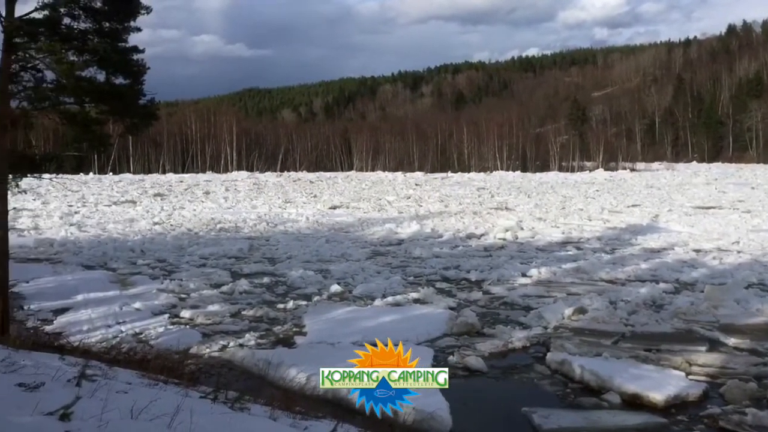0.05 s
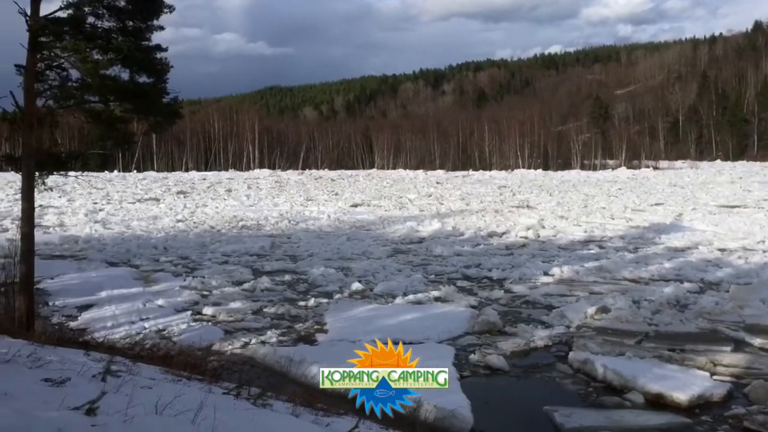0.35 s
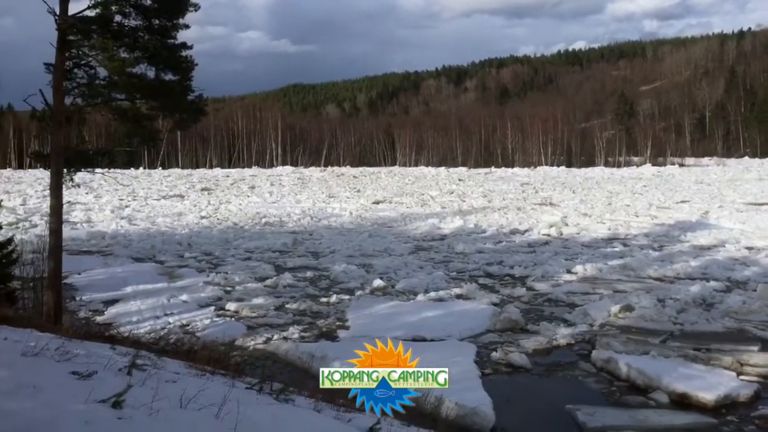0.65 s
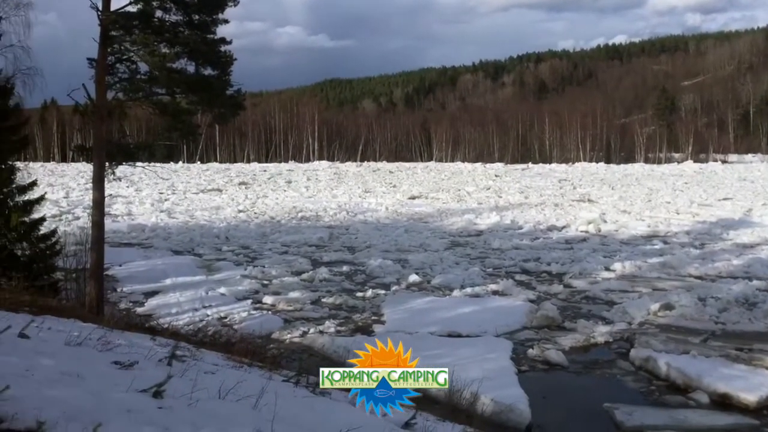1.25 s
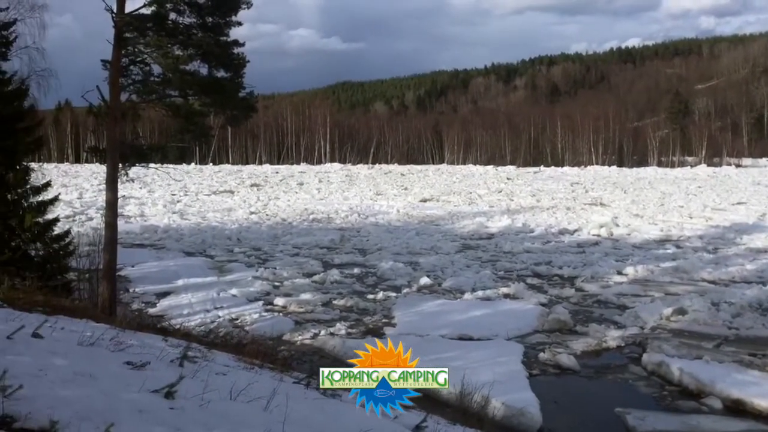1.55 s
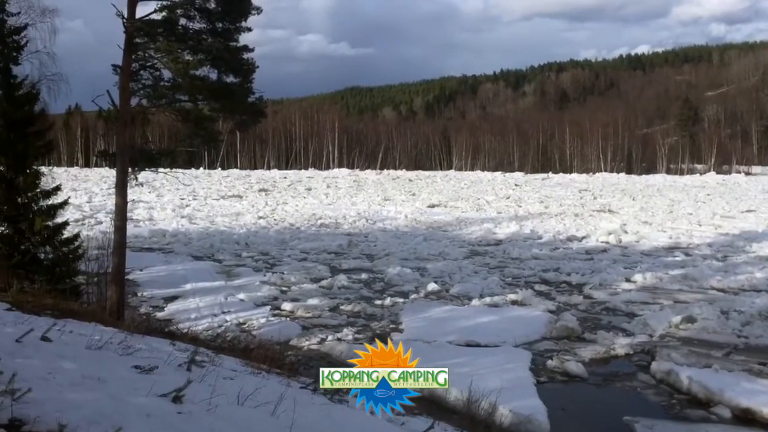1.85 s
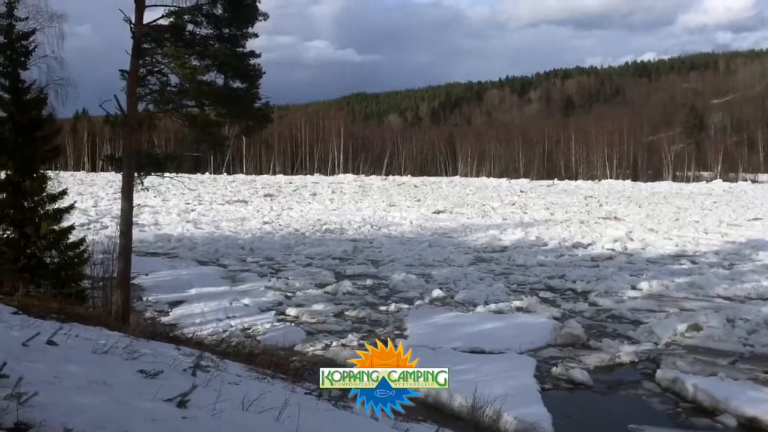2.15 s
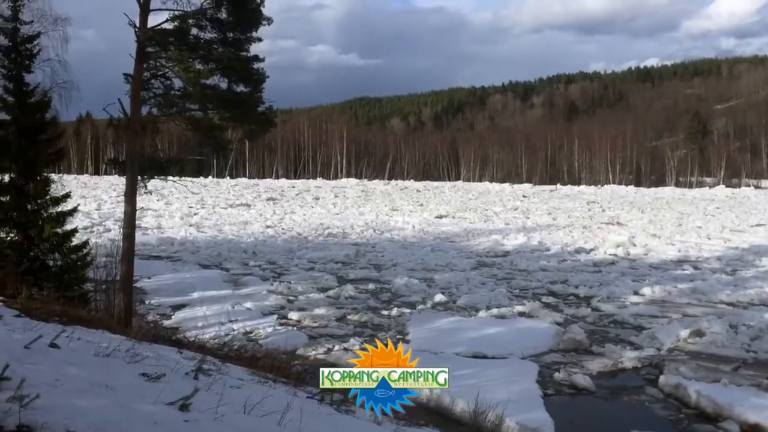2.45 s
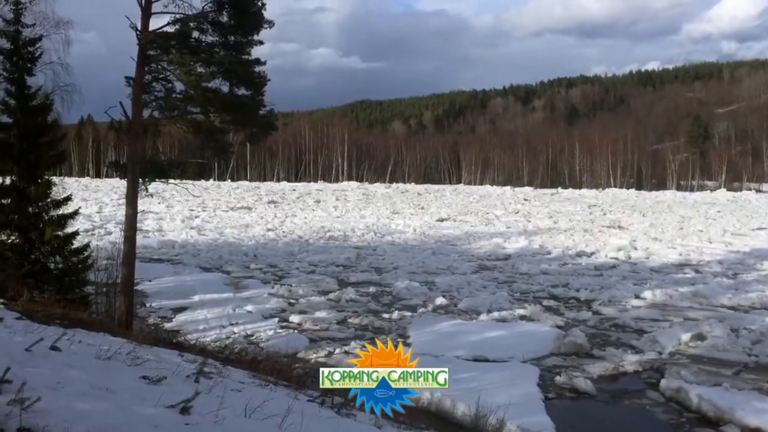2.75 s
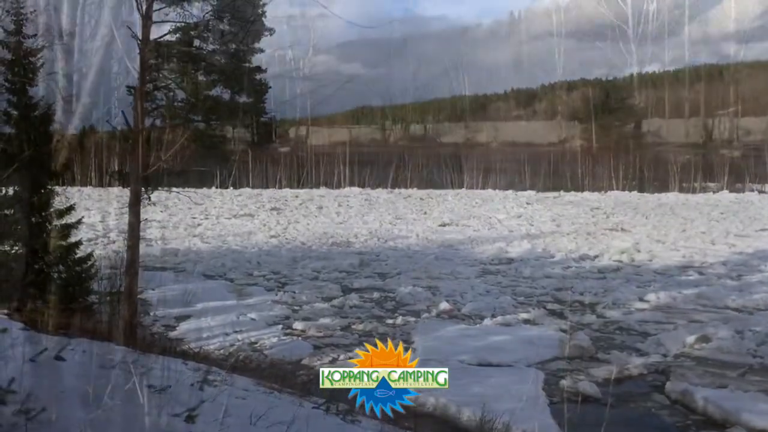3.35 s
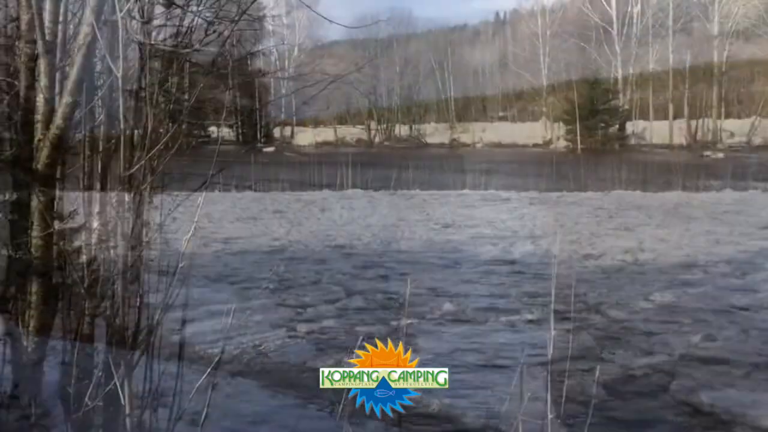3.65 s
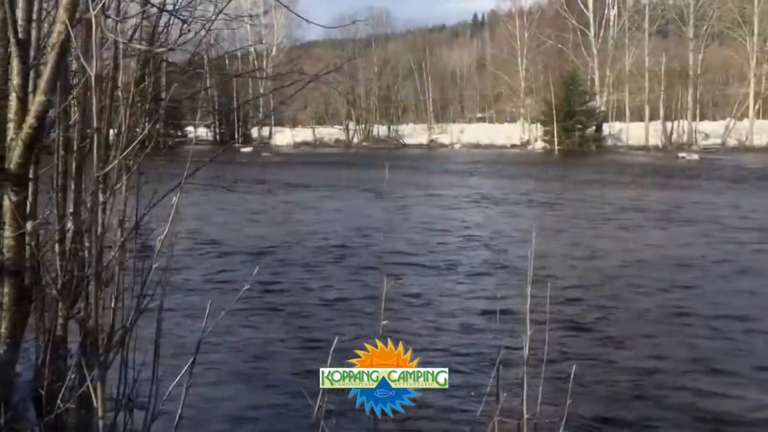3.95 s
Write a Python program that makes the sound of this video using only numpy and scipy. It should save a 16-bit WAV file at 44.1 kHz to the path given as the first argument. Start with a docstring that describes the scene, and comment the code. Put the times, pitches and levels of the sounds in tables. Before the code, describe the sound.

A river carrying ice rushes steadily, dull and soft, with fine crackling and gurgles. Wind bumps the microphone in short low thuds, strongest just before 3 seconds. The ice gives one small chirping snap at the start and several more between 1.5 and 2.4 seconds. From about 3.4 seconds a fuller, splashing rush of open water swells as the wind dies, ending with drips and a small slop near 4 seconds.

```python
"""A wide river carries drifting ice: a steady, dull, turbulent rush with a fine crackle of rubbing floes.
Near the end the fuller, splashing rush of open water swells over the ice.
Wind eddies buffet the microphone in short low bumps; the breeze dies as the open water rises.
A few sharp, chirping snaps stand out, and tiny drips ring as small bubbles by the bank."""
import sys
import numpy as np
from scipy import signal
from scipy.fft import rfft, irfft
from scipy.io import wavfile
from scipy.ndimage import uniform_filter1d

SR = 44100
rng = np.random.default_rng(int(sys.argv[2]) if len(sys.argv) > 2 else 0)


def pcm_store(signal):
    """Save signal as 16-bit PCM."""
    levels = np.round(np.clip(np.atleast_2d(signal), -1, 1) * 32767)
    wavfile.write(sys.argv[1], SR, levels.astype(np.int16).T)


N = 176400


def drifting_ice():
    """Water rushes, gurgles and trickles under the floes, whose edges crackle as they rub."""
    # Spectrum of the icy river. Each row: frequency in Hz, relative density in dB.
    spectrum = [(30, -28), (100, -15), (250, -0.5), (400, 2), (600, -1), (800, -3), (1020, -2), (1400, -5),
                (2150, -3.5), (2800, -16), (3200, -16), (4300, -24), (4900, -30), (5400, -28.5),
                (6300, -29.5), (7700, -36), (9500, -36), (10400, -42), (11200, -38), (15500, -41)]
    crackle = level(colour(clicks(per_s=240, spread_db=2.5), spectrum), -62.5)
    gurgle = level(bubbles(700, 2500, cycles=22, spread_db=18, tilt_db=2.5, count=450), -60)
    trickle = level(bubbles(2400, 7500, cycles=24, spread_db=12.5, tilt_db=-21, count=450), -72)
    flow = level(rush(spectrum, flicker_db=0.38, flicker_hz=12), -51)
    ebb_db_per_s = -0.45
    return (flow + crackle + gurgle + trickle) * undb(ebb_db_per_s * (np.arange(N) - N / 2) / SR)


def open_water():
    """A fuller turbulent rush with splashes and a spray of fine bubbles."""
    # Spectrum of open water. Each row: frequency in Hz, relative density in dB.
    spectrum = [(40, -5), (110, -7), (200, 1), (420, 3), (1100, -0.5), (2100, -4.5), (3200, -16.5),
                (4800, -26), (6000, -30), (7700, -40), (15500, -42)]
    splashes = level(colour(clicks(per_s=560, spread_db=2.5), spectrum), -49.5)
    spray = level(bubbles(3530, 13800, cycles=16, spread_db=9, tilt_db=-26, count=1800), -67.5)
    flow = level(rush(spectrum, flicker_db=1.5, flicker_hz=16), -45.5)
    return flow + splashes + spray


def wind(breeze_gain):
    """A low fluttering breeze, and eddies that bump the microphone."""
    # Eddies. Each row: start in seconds, length in seconds, rms level in dB, upper edge in Hz.
    buffets = [(.005, 0.04, -45, 107), (0.082, 0.04, -46, 136), (0.182, 0.097, -47, 172),
               (0.231, .065, -43.5, 200), (.335, 0.022, -44.5, 122), (.5, 0.063, -38, 220),
               (.575, 0.021, -45, 191), (0.821, 0.047, -43, 204), (0.888, 0.065, -38, 187),
               (1.065, 0.071, -51, 168), (1.119, 0.066, -44.5, 131), (1.256, 0.065, -47.5, 164),
               (1.307, 0.089, -45, 151), (1.474, 0.028, -45, 145), (1.561, 0.045, -47, 131),
               (1.744, 0.031, -44.5, 152), (1.799, 0.048, -38, 185), (1.843, 0.043, -37, 119),
               (2.327, 0.027, -41.5, 186), (2.36, 0.09, -44.5, 188), (2.49, 0.038, -39.5, 185),
               (2.59, 0.046, -47, 127), (2.696, .03, -46, 117), (2.79, 0.034, -46, 131),
               (2.945, 0.028, -26, 194), (2.971, 0.076, -40, 146), (3.05, 0.038, -37, 93),
               (3.122, 0.15, -59, 97), (3.294, 0.05, -45, 266), (3.334, 0.032, -49.5, 140),
               (3.565, .04, -57, 102)]
    flutter = 1 + 0.5 * np.tanh(4.5 * walk(rate_hz=24.2))
    breeze = band(rng.standard_normal(N), 42, 98.4, order=3) * flutter
    out = level(breeze, -50.5) * breeze_gain
    for start_s, length_s, db, top_hz in buffets:
        add(out, start_s, swirl(length_s, db, 46.3, top_hz, knee_hz=82, attack_s=0.0058, release_s=0.02))
    return out


def snaps():
    """Each snap is a bright tick, a very fast downward chirp and a short dull tail."""
    # Snaps. Each row: start in seconds, body gain in dB, tick gain in dB, initial chirp pitch in Hz.
    events = [(0.0936, -34, -59, 820), (1.5003, -33.5, -57, 3580), (1.5315, -40, -70, 2650),
              (1.621, -33.5, -68, 2990), (1.7525, -35, -58, 3050), (1.9085, -37, -58, 3230),
              (2.193, -38, -70, 2460), (2.2483, -36.5, -49.5, 4470), (2.3785, -41, -53, 1750)]
    end_hz, glide_s, peak_s = 370, 0.001058, 0.0014
    tail_s, tick_s = 0.011, 0.00036
    out, t = np.zeros(N), np.arange(SR // 20) / SR
    for start_s, body_db, tick_db, high_hz in events:
        hz = end_hz + (high_hz - end_hz) * np.exp(-t / glide_s)
        phase = 2 * np.pi * (np.cumsum(hz) / SR + rng.random())
        chirp = np.sin(phase) * t / peak_s * np.exp(1 - t / peak_s)
        dull_noise = band(rng.standard_normal(len(t)), 167, high_hz / 2, order=3)
        tail = level(dull_noise, -10.5) * np.exp(-t / tail_s)
        tick = level(band(rng.standard_normal(len(t)), 2000, 14000), tick_db) * np.exp(-t / tick_s)
        body = band(chirp + tail, 110, high_hz, order=3)
        add(out, start_s, undb(body_db) * body + tick)
    return out


def near_water():
    """Single drips and splashes by the bank; one wavelet slops over."""
    # Drips. Each row: start in seconds, gain in dB, pitch in Hz.
    drips = [(.851, -68, 7040), (2.553, -62, 6230), (2.773, -58, 5900), (2.7846, -55.5, 6110),
             (3.578, -62, 9300), (3.6366, -61, 13300), (3.7754, -63, 12400), (3.9645, -51.5, 8810),
             (3.964, -51, 5940), (3.9828, -45, 6400)]
    # Splashes. Each row: start and length in seconds, rms level in dB, lower and upper edge in Hz.
    splashes = [(3.66, 0.017, -77, 5200, 7000), (3.692, 0.033, -69, 4500, 6460),
                (3.758, .006, -70, 5200, 7000), (3.808, .006, -69, 4800, 6400),
                (3.847, 0.024, -70, 4600, 6500), (3.922, .015, -72, 5500, 12500),
                (3.945, 0.017, -75, 4500, 13000), (3.962, 0.0016, -55, 4460, 14000),
                (3.978, 0.0016, -71, 3800, 11900), (3.966, 0.045, -70, 2600, 14400)]
    out = np.zeros(N)
    for start_s, db, hz in drips:
        add(out, start_s, undb(db) * bubble(hz, cycles=16))
    for start_s, length_s, db, low_hz, top_hz in splashes:
        splash = swirl(length_s, db, low_hz, top_hz, knee_hz=top_hz, attack_s=0.0014, release_s=0.0022)
        add(out, start_s, splash)
    slop = swirl(0.02, db=-41.5, low_hz=1020, top_hz=1760, knee_hz=1760, attack_s=0.001, release_s=0.006)
    add(out, 3.965, slop)
    return out


def rush(points, flicker_db, flicker_hz):
    """Turbulent noise whose octaves flicker independently."""
    spectrum = rfft(colour(rng.standard_normal(N), points))
    octave = np.log2(np.arange(N // 2 + 1) * SR / N + 1)
    bands = (irfft(spectrum * np.clip(1 - abs(octave - k), 0, 1), N) for k in range(4, 16))
    return sum(x * undb(flicker_db * walk(flicker_hz)) for x in bands)


def clicks(per_s, spread_db):
    """Random impulses, most of them weak."""
    impulses = (rng.random(N) < per_s / SR) * rng.choice([-1, 1], N)
    return impulses * undb(spread_db * np.minimum(rng.exponential(size=N), 3))


def bubbles(low_hz, top_hz, cycles, spread_db, tilt_db, count):
    """Bubbles of random time, pitch and strength; tilt_db is the gain at top_hz relative to low_hz."""
    out = np.zeros(N)
    for when, pitch, strength in rng.random((count, 3)):
        ring = bubble(low_hz * (top_hz / low_hz) ** pitch, cycles)
        add(out, when * N / SR, ring * undb(spread_db * strength ** 2 + tilt_db * pitch))
    return out


def bubble(hz, cycles):
    """A small bubble rings, decaying by 1/e over the given cycles."""
    t = np.arange(int(5 * cycles / hz * SR)) / SR
    age = t * hz / cycles
    return np.sin(2 * np.pi * hz * t) * np.exp(-age) * (1 - np.exp(-10 * age))


def swirl(length_s, db, low_hz, top_hz, knee_hz, attack_s, release_s):
    """A short swirl of air or water: band noise, weaker above the knee, sagging over its length."""
    sag_db = -11.5
    t = np.arange(int((length_s + release_s / 2) * SR)) / SR
    ramp = np.clip(np.minimum(t / attack_s, (t[-1] - t) / release_s), 0, 1)
    envelope = np.sin(np.pi / 2 * ramp) ** 2 * undb(sag_db * t / length_s)
    noise = signal.lfilter([1], [1, -np.exp(-2 * np.pi * knee_hz / SR)], rng.standard_normal(SR // 2))
    settled = band(noise, low_hz, top_hz, order=4)[SR // 4:]
    return level(settled[:len(t)] * envelope, db)


def walk(rate_hz):
    """Random steps, smoothed twice; unit standard deviation."""
    hold = int(SR / rate_hz)
    steps = np.repeat(rng.standard_normal(512)[:N // hold + 1], hold)
    smooth = uniform_filter1d(uniform_filter1d(steps, hold), hold)[:N]
    return smooth / smooth.std()


def colour(x, points):
    """Filter x by a curve of (Hz, dB) points."""
    hz, db = np.array(points).T
    bin_hz = np.arange(N // 2 + 1) * SR / N
    return irfft(rfft(x) * undb(np.interp(np.log(bin_hz + 1), np.log(hz), db)), N)


def band(x, low_hz, top_hz, order=2):
    """Butterworth band-pass."""
    edges_hz = [low_hz, np.clip(top_hz, low_hz + 10, SR / 2 - 1)]
    return signal.sosfilt(signal.butter(order, edges_hz, "band", fs=SR, output="sos"), x)


def undb(db):
    """dB to amplitude."""
    return 10 ** (np.asarray(db) / 20)


def level(x, db):
    """Scale to an rms level."""
    return x * undb(db) / np.sqrt(np.mean(x ** 2) + 1e-20)


def add(out, start_s, x):
    """Mix x into out at start_s."""
    i = int(np.clip(start_s * SR, 0, N - 1))
    out[i:i + len(x)] += x[:N - i]


def scene():
    """Mono mix; as open water swells, the ice drops by a quarter and the breeze dies."""
    swell_start_s, swell_s, breeze_decay_s = 3.358, 0.53, 0.25
    since_s = np.maximum(np.arange(N) / SR - swell_start_s, 0)
    swell = np.minimum(since_s / swell_s, 1)
    river = drifting_ice() * (1 - 0.25 * swell) + open_water() * swell
    return (river + wind(np.exp(-since_s / breeze_decay_s)) + snaps() + near_water())[None]


def record(dry):
    """The recorder thins the deepest bass and cuts the top."""
    low_hz, top_hz = 33, 15700
    thin = signal.sosfilt(signal.butter(3, low_hz, "high", fs=SR, output="sos"), dry)
    return signal.sosfilt(signal.ellip(10, 0.2, 70, top_hz, fs=SR, output="sos"), thin)


dry = scene()
out = record(dry)
pcm_store(out)
```